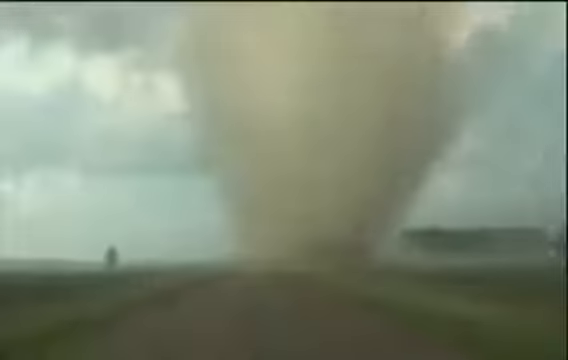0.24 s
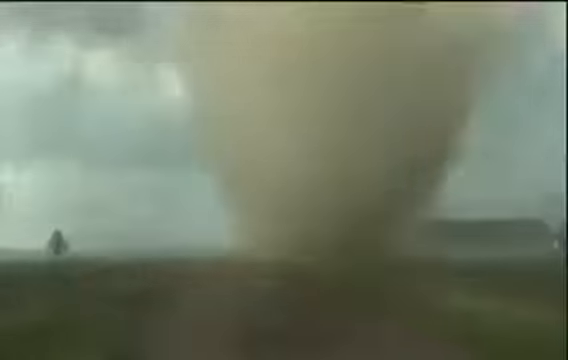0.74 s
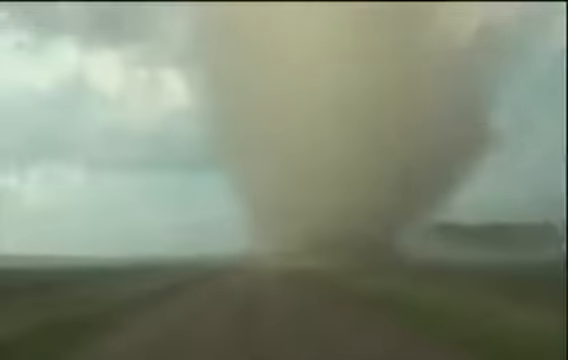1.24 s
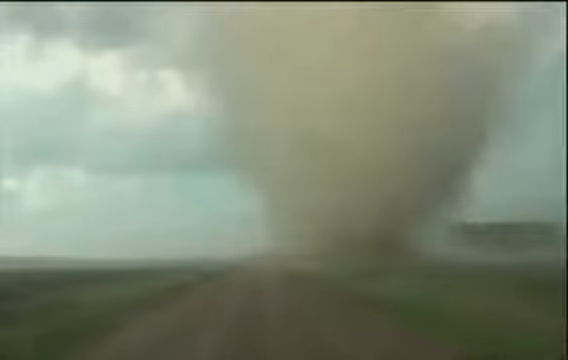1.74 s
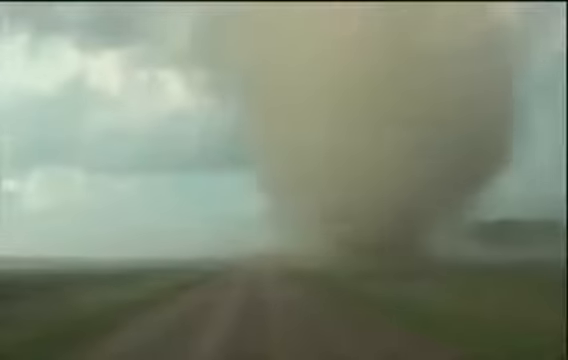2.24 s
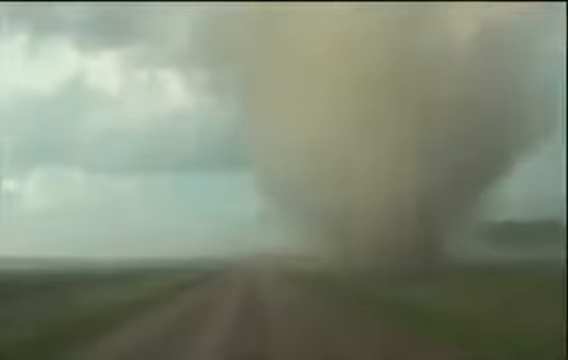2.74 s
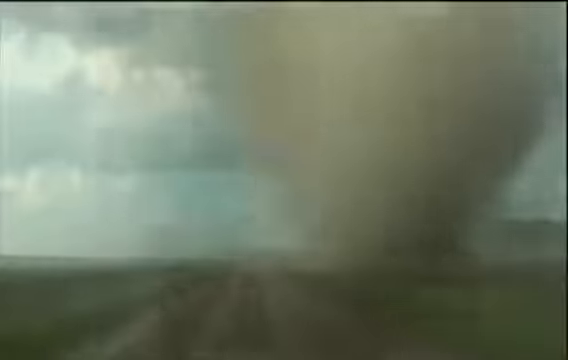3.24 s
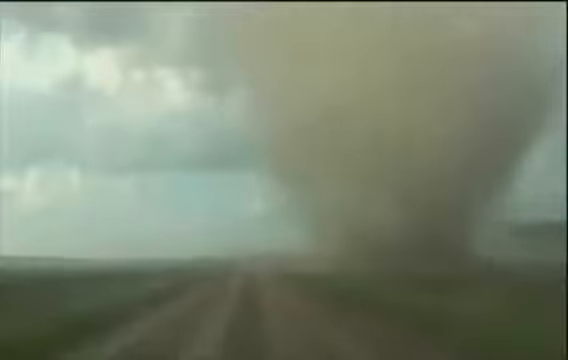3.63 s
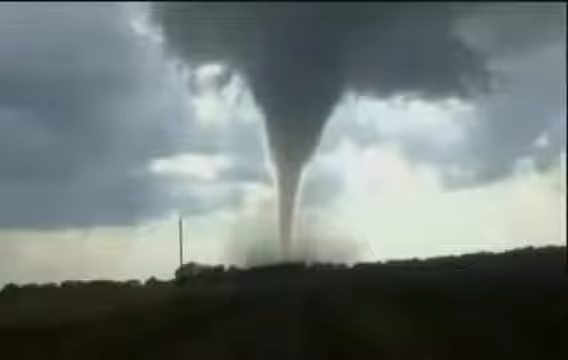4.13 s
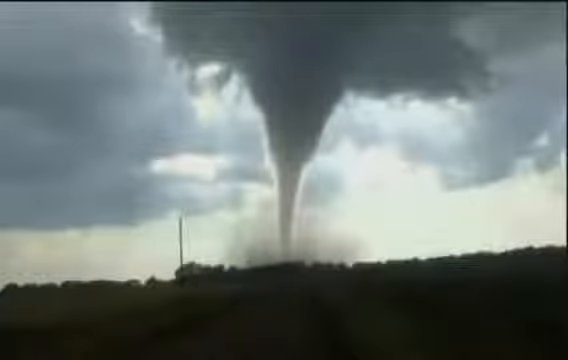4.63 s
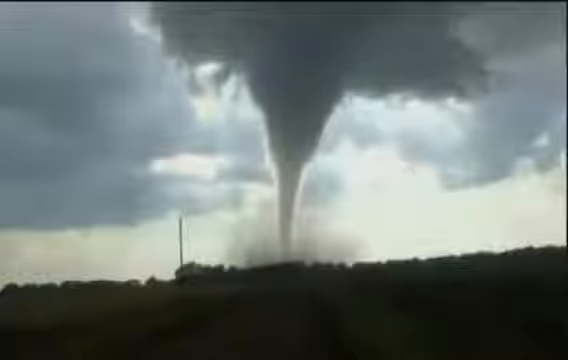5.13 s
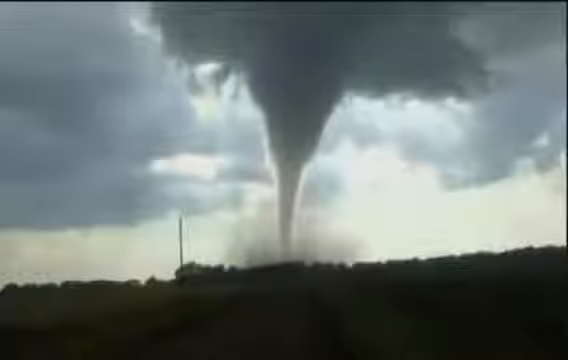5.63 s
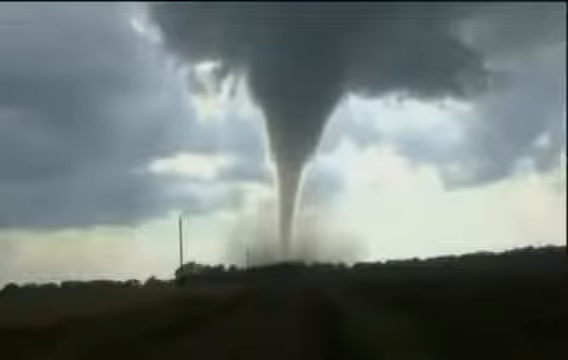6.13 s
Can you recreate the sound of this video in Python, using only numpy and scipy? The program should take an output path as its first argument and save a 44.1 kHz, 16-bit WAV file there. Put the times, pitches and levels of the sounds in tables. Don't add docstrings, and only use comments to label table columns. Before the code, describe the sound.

Close, overloaded storm roar with debris thudding and snapping on car bodywork, cutting suddenly to soft low wind, hiss and a faint whistling bird.

```python
import sys
import numpy as np
from scipy import signal
from scipy.fft import rfft, irfft
from scipy.io import wavfile
from scipy.ndimage import uniform_filter1d, minimum_filter1d

SR = 44100
rng = np.random.default_rng(int(sys.argv[2]) if len(sys.argv) > 2 else 0)


def transcribe(u):
    v = np.clip(np.atleast_2d(u).T, -1, 1)
    q = np.round(v * 32767).astype(np.int16)
    wavfile.write(sys.argv[1], SR, q)


def decibels_to_gain(level_db):
    exponent = np.asarray(level_db, float) / 20
    return 10 ** exponent


N = 282240

# frequency_hz [Hz], density_db [dB per Hz]
NEAR_SPECTRUM = [(12, -36.5), (20, 6), (54, 4), (156, -8.5), (264, -14.5), (326, -12), (613, -16),
                 (1070, -26), (1950, -32), (2230, -30.5), (7870, -39), (8980, -41.5), (10800, -45.5),
                 (14000, -90), (22000, -120)]
# time_s [s], force_db [dB], dust_db [dB]
NEAR_GALE = [(0.0, 0, -43.5), (0.3, 4.5, -40), (0.55, -0.5, -38), (1.1, 2, -37), (1.4, 4, -42),
             (1.65, 1, -40.5), (1.95, -2, -37.5), (2.12, 2, -32), (2.3, -1, -35.5), (2.5, -3, -32),
             (2.7, -1.5, -38), (2.95, -1.5, -41), (3.27, 0, -34.5), (3.5, 3, -40), (3.72, -2, -39),
             (4.0, 0.5, -37)]
# centre_s [s], lift_db [dB], length_s [s]
PORT_SLAMS = [(0.02, 9.5, 0.22), (0.21, 4, .08), (0.32, 4, 0.38), (0.5, 7, 0.11), (0.58, 13, .13),
              (0.72, 11, 0.082), (0.79, 5, .07), (0.84, 5, 0.1), (1.02, 11.5, 0.26), (1.14, 5.5, 0.13),
              (1.39, 9.5, 0.14), (1.5, 12, 0.12), (1.68, 7.5, 0.21), (1.86, 12.5, 0.22), (1.94, 8, .08),
              (2.03, 9, 0.24), (2.33, 11.5, 0.078), (2.43, 10.5, 0.1), (2.6, 5, .2), (2.8, 4.5, 0.21),
              (2.9, 6, 0.11), (2.99, 12.5, 0.087), (3.2, 3.5, 0.2), (3.37, 4.5, 0.16), (3.51, 5, 0.4),
              (3.68, 8, 0.21), (3.79, 14, 0.11), (3.94, 5.5, 0.19), (4.0, 8.5, 0.079)]
# centre_s [s], lift_db [dB], length_s [s]
BODY_ROLLS = [(0.08, 7, .15), (0.17, 3, 0.085), (0.44, 2.5, 0.27), (0.72, 6, 0.13), (0.87, 2.5, 0.29),
              (0.98, -4, 0.085), (1.06, 7, 0.14), (1.13, 6, 0.048), (1.18, -8.5, 0.05), (1.23, 2, 0.12),
              (1.36, -1, 0.22), (1.5, -2, 0.11), (1.67, 5, .14), (1.78, 4.5, 0.063), (1.85, 7, 0.2),
              (1.96, -2.5, .1), (2.07, -1, 0.12), (2.27, -1.5, .1), (2.44, 1.5, 0.086), (2.52, 2, 0.088),
              (2.6, -3, 0.067), (2.66, 0, 0.11), (2.73, -2, .14), (2.92, 1, 0.2), (3.05, 3, 0.13),
              (3.29, 5, 0.096), (3.55, 0.5, .12), (3.69, 2, 0.11), (3.94, 2, 0.089)]


def near_storm():
    force_db, dust_db = in_time(NEAR_GALE)
    rolls_db = eddies(BODY_ROLLS)
    duck_db = ducking(attack_s=.02, release_s=.065)
    port_duck_db = 1.3 * ducking(attack_s=.006, release_s=.08)

    buffet_db = -27 + force_db + eddies(PORT_SLAMS) + port_duck_db
    rumble_db = -24 + force_db + rolls_db + duck_db
    roar_db = -30.5 + .6 * force_db + .43 * rolls_db + .14 * (dust_db + 38.5) + .7 * duck_db
    grit_db = dust_db + 1.15 * duck_db + 1.5

    buffet = decibels_to_gain(buffet_db) * wind(NEAR_SPECTRUM, 22, 80, 1.6, 18.0, .6, 5.2)
    rumble = decibels_to_gain(rumble_db) * wind(NEAR_SPECTRUM, 84, 310, .96, 5.1, .55, 11.0)
    roar = decibels_to_gain(roar_db) * wind(NEAR_SPECTRUM, 275, 1325, 2.2, 8.4, 1.3, 24.0)
    grit = decibels_to_gain(grit_db) * wind(NEAR_SPECTRUM, 1350, 11000, 1.7, 22.0, 1.3, 25.0)
    return buffet + rumble + roar + grit


# start_s [s], depth_db [dB]
GAIN_DIPS = [
    (0.119, 9.5),
    (1.442, 8),
    (2.109, 11),
    (2.261, 1.5),
    (2.669, 1.5),
    (2.798, 0.5),
    (3.299, 8),
    (3.395, 2.5),
    (3.743, 9),
]


def ducking(attack_s, release_s):
    start_s, depth_db = np.transpose(GAIN_DIPS)
    after = np.maximum(np.arange(N) / SR - start_s[:, None], 0)
    dip = (1 - np.exp(-after / attack_s)) * np.exp(-after / release_s)
    return -depth_db @ dip / dip.max()


# start_s [s], peak_db [dB], pitch_hz [Hz], length_s [s]
DOOR_KNOCKS = [(0.271, -21, 399, 0.036), (1.034, -13.5, 672, 0.026), (1.448, -13.5, 742, 0.016),
               (2.1135, -13, 896, 0.014), (2.116, -11, 1700, 0.014), (2.131, -12, 636, 0.022),
               (2.14, -17, 418, .02), (2.121, -4.5, 418, 0.018), (3.298, -6.5, 512, 0.018),
               (3.697, -45, 633, 0.013), (3.98, -13, 981, 0.021)]


def door_knocks():
    return decibels_to_gain(-2.5) * swells(DOOR_KNOCKS)


# start_s [s], peak_db [dB], thud_db [dB], splinter_db [dB], crack_hz [Hz]
STONE_CRACKS = [
    (0.1172, -16, 1, -18.5, 2090),
    (2.6654, -23.5, 6, -2, 2390),
    (3.298, -23, 1, -3, 1800),
]
GRAIN_TICKS = [
    (0.118, -8.5, -12, -21.5, 1950),
    (2.261, -16.5, -10, -8, 1600),
    (2.5594, -19, -6.5, -11, 4200),
    (2.6147, -15, -13.5, -14.5, 5060),
]
TWIG_SNAPS = [
    (1.441, -8, -12, -13.5, 2040),
    (3.3958, -22.5, -4.5, -1, 2580),
]
HARD_CLODS = [
    (2.109, -10.5, -0.5, -3.5, 3580),
    (2.796, -20, -3, -17, 4130),
    (3.7400, -19, -5.5, -0.5, 3380),
]
DULL_SCUFFS = [
    (0.2712, -27, 6, -27, 1600),
    (1.0256, -27, 6.5, -8, 1600),
    (1.447, -25, 1, -33, 800),
    (2.137, -30.5, 2.5, -7.5, 1900),
    (2.1639, -29, -8, -2, 1870),
    (2.318, -29, -9, -3, 2260),
    (2.9273, -36.5, -11.5, -0.5, 1600),
    (3.247, -34.5, 1, 3.5, 2070),
]
GRAVEL_SPRAYS = [
    (3.687, -19.5, 4, -6.5, 1900),
    (3.966, -23, 7, -4, 1740),
]
# start_s [s], peak_db [dB], thud_db [dB], splinter_db [dB]
SMALL_SPATTER = [(0.357, -31.5, -16, -1.5), (0.396, -30, 1.5, -8.5), (0.633, -27, -5, -4),
                 (0.947, -21, -11, -13.5), (1.1092, -32.5, -1, -19), (1.22, -29.5, -9, -21),
                 (1.281, -26.5, -8.5, -19), (1.5674, -25, -5, -12), (1.6102, -27.5, 0, -16),
                 (1.7801, -36, -3, -18), (1.8275, -21.5, -5, -21), (2.0136, -23.5, 2.5, -4.5),
                 (2.0708, -35, 8.5, 2.5), (2.2185, -31, 5, -15), (2.361, -26.5, -5.5, -7),
                 (2.3993, -30, -10.5, 3), (2.5241, -20, -2, -11), (2.759, -29.5, -0.5, -11),
                 (3.3737, -28, -10, -10), (3.8707, -27.5, -5.5, -12), (3.9154, -29.5, -17, -1.5)]


def blows():
    hits = [(*r, .024) for r in STONE_CRACKS]
    hits += [(*r, .0065) for r in GRAIN_TICKS]
    hits += [(*r, .0035) for r in TWIG_SNAPS]
    hits += [(*r, 1700, .016) for r in SMALL_SPATTER]
    hits += [(*r, .025) for r in DULL_SCUFFS]
    hits += [(*r, .009 - .01 * (r[1] + 18)) for r in HARD_CLODS]
    return [(*r, .05) for r in hits] + [(*r, .026, .25) for r in GRAVEL_SPRAYS]


# start_s [s], peak_db [dB], thud_db [dB], splinter_db [dB], crack_hz [Hz]
FLYING_SHARDS = [(0.1245, -20, -4.5, -10.5, 2580), (0.1325, -20.5, -3.5, -12.5, 2300),
                 (0.146, -28.5, -2.5, -11, 1990), (0.512, -29.5, -7, -8, 2520), (1.0373, -25, 2, -10, 1900),
                 (1.4435, -13, -7.5, -31, 1050), (2.1095, -13.5, -2.5, -8, 1740),
                 (2.116, -12, -3.5, -6.5, 2100), (2.123, -16, -2.5, -5.5, 2110),
                 (2.129, -20.5, 1, -4, 1910), (2.471, -29.5, -13, -1, 3000), (2.675, -22.5, 1, -6.5, 1790),
                 (3.288, -26, -0.5, -4, 1800), (3.3013, -26, -4, 2.5, 3000), (3.51, -30.5, -5, -14.5, 2610),
                 (3.702, -25, -1, -2.5, 2600), (3.7435, -21.5, -14, -6, 3130), (3.464, -31, -15, -1, 1700)]


def shards():
    return debris([(*r, .0062, .05) for r in FLYING_SHARDS])


# mode_hz [Hz], width_hz [Hz], level_db [dB]
PANEL_MODES = [
    (462, 42, -0.5),
    (932, 170, -8),
]


def debris(hits):
    out = np.zeros(N)
    t = np.arange(round(.2 * SR)) / SR
    for s, peak_db, thud_db, splinter_db, crack_hz, length, rise_share in sorted(hits):
        grains = rms_one(rng.standard_normal(len(t)) * decibels_to_gain(2.4 * rng.exponential(1, len(t))))
        grains[:40] += 1.2 * np.hanning(40) * np.sign(grains[:40])

        length = np.clip(length, .002, .06)
        rise = 1 - np.exp(-t / (abs(rise_share) * length))
        crumbs = decibels_to_gain(-22.0) * np.exp(-t / (3.0 * length))
        burst = grains * rise * (np.exp(-(t / length) ** 2.4) + crumbs)
        sharp = grains * rise * np.exp(-(t / ((.75 + rise_share) * length)) ** 1.8)

        centre_hz = max(crack_hz, 1600)
        crack = decibels_to_gain(.5) * band(burst, .6 * centre_hz, 1.51 * centre_hz) + band(burst, 1100, 6300)
        crack = band(crack, 780, min(3.6 * crack_hz, 6500))
        thud = band(burst, 334, 1493)
        ringing = sum(decibels_to_gain(db) * band(thud, hz - width / 2, hz + width / 2) for hz, width, db in PANEL_MODES)
        thud = thud + ringing
        splinters = band(band(sharp, 5000, 9200), 3500, 10200)

        hit = decibels_to_gain(-1.0) * crack + decibels_to_gain(thud_db + 8.5) * thud + decibels_to_gain(splinter_db + 9) * splinters
        at = round(s * SR)
        out[at:at + len(t)] += decibels_to_gain(peak_db) * hit
    return out


# frequency_hz [Hz], density_db [dB per Hz]
FAR_SPECTRUM = [(12, -57), (20, -50.5), (86, -18), (124, -26), (209, -3), (288, -10), (340, -20.5),
                (445, -18.5), (526, -22.5), (699, -26), (1100, -36.5), (1430, -67), (2420, -120)]
# frequency_hz [Hz], density_db [dB per Hz]
HISS_SPECTRUM = [(900, -0.5), (1200, -4), (1500, -2.5), (2500, -3.5), (4000, -6.5), (5150, -6.5),
                 (5600, -15), (6200, -11), (7200, -18.5), (7800, -14.5), (8800, -23), (9800, -15.5),
                 (10800, -19), (12000, -35)]
# time_s [s], force_db [dB]
FAR_BREEZE = [
    (4.02, 6.5),
    (4.17, 7),
    (4.24, -1.5),
    (4.6, -4),
    (5.0, -3),
    (5.3, 2.5),
    (5.55, 1),
    (5.65, -0.5),
    (6.4, 1),
]
# centre_s [s], lift_db [dB], length_s [s]
AIR_LUMPS = [(4.08, 8.5, 0.13), (4.18, 5.5, .08), (4.32, 4.5, 0.27), (4.38, 4, .08), (4.47, 5, 0.12),
             (4.78, 8.5, 0.18), (4.88, 8, 0.098), (4.97, 1, .07), (5.24, -1, .1), (5.32, -10, .08),
             (5.4, 2.5, .1), (5.53, 9, 0.17), (5.7, 9, .16), (5.91, 5.5, .1), (6.0, 7.5, .07),
             (6.14, 4.5, .12), (6.24, 2, .1), (6.38, 5, .1)]
# centre_s [s], lift_db [dB], length_s [s]
AIR_FLURRIES = [(4.09, 3, 0.08), (4.48, 4.5, 0.073), (4.76, 1, .08), (4.95, 4.5, 0.076), (5.15, 1.5, 0.14),
                (5.33, 1, .1), (5.53, 6.8, 0.071), (5.72, 1, .1), (5.87, 4.5, 0.11), (6.09, 5.5, 0.1),
                (6.27, 5.1, 0.085), (6.35, 1.7, .06)]
# start_s [s], peak_db [dB], pitch_hz [Hz], length_s [s]
CAVITY_PUFFS = [(4.041, -16.5, 222, 0.07), (4.141, -28.5, 150, 0.03), (4.169, -28, 187, 0.026),
                (4.451, -31, 250, 0.02), (4.766, -50, 175, 0.027), (5.118, -24.5, 190, 0.04),
                (5.291, -20.5, 231, 0.035), (5.378, -20.5, 200, 0.037), (5.435, -27, 240, 0.029),
                (5.497, -22.5, 206, 0.038), (5.522, -18.5, 233, 0.036), (5.689, -30, 253, 0.036),
                (5.853, -24, 204, 0.024), (6.074, -24, 210, 0.053), (6.22, -21, 163, 0.034)]


def far_wind():
    (force_db,) = in_time(FAR_BREEZE)
    flurry_db = eddies(AIR_FLURRIES)
    thump_db = -43 + force_db + eddies(AIR_LUMPS)
    cavity_db = -40 + .8 * force_db + flurry_db
    roar_db = -45.5 + .29 * force_db + flurry_db

    thump = decibels_to_gain(thump_db) * wind(FAR_SPECTRUM, 24, 154.2, 2.9, 6.2, 2.6, 4.7)
    cavity = decibels_to_gain(cavity_db) * wind(FAR_SPECTRUM, 180, 332, 3.9, 62.0, 1.8, 37.0)
    roar = decibels_to_gain(roar_db) * wind(FAR_SPECTRUM, 324, 1160, .41, 24.0, 1.6, 60.0)
    hiss = decibels_to_gain(-51.5) * wind(HISS_SPECTRUM, 860, 16000, .28, 11.0, 1.0, 10.0)
    return thump + cavity + swells(CAVITY_PUFFS) + roar + hiss


# start_s [s], top_hz of the pitch arch [Hz], level_db [dB]
BIRD_PHRASES = [
    (4.04, 5300, -54),
    (4.415, 5400, -53),
    (4.795, 5250, -53),
    (5.15, 5100, -53),
    (5.55, 5200, -52.5),
    (5.93, 5200, -52.5),
    (6.31, 5200, -53),
]
# time_s into the phrase [s], pitch_share of top_hz [ratio]
PITCH_ARCH = [
    (0, .98),
    (.06, 1.02),
    (.11, 1.01),
    (.16, .93),
    (.26, .89),
    (.33, .88),
]


def bird():
    out = np.zeros(N + SR)
    t = np.arange(round(.019 * SR)) / SR
    fall = 1.05 - .11 * t / t[-1]
    spacing_s = .0195
    for s, top_hz, level_db in BIRD_PHRASES:
        for k, (detune, accent) in enumerate(rng.standard_normal((16, 2))):
            weak = 1 - k % 2
            arch_hz = top_hz * np.interp(spacing_s * k, *np.transpose(PITCH_ARCH))
            hz = arch_hz * (1 + .02 * detune - .04 * weak) * fall
            note = np.hanning(len(t)) * np.sin(2 * np.pi * np.cumsum(hz) / SR)
            note_db = level_db + 1 - 2.5 * weak - .3 * k + 1.8 * accent - .5
            at = round((s + spacing_s * k) * SR)
            out[at:at + len(t)] += decibels_to_gain(note_db) * note
    return out[:N]


def wind(colour, low_hz, high_hz, gust_db, gust_rate, patch_db, patch_rate):
    hz = np.arange(N // 2 + 1) * SR / N + 1
    points = np.array(colour)
    colour_db = np.interp(np.log(hz), np.log(points[:, 0]), points[:, 1])
    spectrum = rfft(rng.standard_normal(N)) * decibels_to_gain(colour_db)
    count = int(np.ceil(2 * np.log2(high_hz / low_hz)))
    place = np.log(hz / low_hz) / np.log(high_hz / low_hz) * count
    gust = gust_db * drift(gust_rate)
    out = 0
    for k in range(count + 1):
        share = np.cos(np.pi / 2 * np.clip(place - k, -1, 1)) ** 2
        share = share * (.7 if k in (0, count) else 1)
        out = out + irfft(spectrum * share, N) * decibels_to_gain(gust + patch_db * drift(patch_rate))
    out = out / (uniform_filter1d(out ** 2, size=5000) + 1e-20) ** .3
    return rms_one(out)


def eddies(table):
    t = np.arange(N) / SR
    total_db = 0
    for s, lift_db, length in table:
        total_db = total_db + lift_db * np.cos(np.pi * np.clip((t - s) / length, -.5, .5)) ** 2
    return total_db


def swells(table):
    out = np.zeros(N)
    for s, peak_db, hz, length in table:
        t = np.arange(round(np.clip(length, .01, .1) * SR)) / SR
        at = round((s - .006) * SR)
        out[at:at + len(t)] += decibels_to_gain(peak_db - 4.0) * np.hanning(len(t)) * np.sin(2 * np.pi * hz * t)
    return out


def drift(rate):
    r = np.exp(-80 * np.pi * rate / SR)
    slow = signal.lfilter([1], [1, -2 * r, r * r], rng.standard_normal(N // 40 + 2002))[2000:]
    return np.interp(np.arange(N) / 40, np.arange(len(slow)), rms_one(slow))


def in_time(rows):
    s, *columns = np.transpose(rows)
    return [np.interp(np.arange(N) / SR, s, c) for c in columns]


def band(x, low_hz, high_hz):
    return signal.sosfilt(signal.butter(2, [low_hz, high_hz], "band", fs=SR, output="sos"), x)


def rms_one(x):
    return x / np.sqrt(np.mean(x ** 2) + 1e-20)


def scene():
    far = np.clip((np.arange(N) / SR - 4.004) / .014, 0, 1)
    near_sound = near_storm() + debris(blows()) + door_knocks()
    far_sound = far_wind() + bird()
    mono = (1 - far) * near_sound + far * far_sound + shards()
    return np.stack([mono, mono])


def coarse_rounding(mid, side, size, spread, mid_db, narrow_db):
    n = np.arange(2 * size)
    k = np.arange(size * 99 // 200)
    window = np.sin(np.pi * (n + .5) / (2 * size))
    basis = window[:, None] * np.cos(np.pi / size * np.outer(n + .5 + size / 2, k + .5))
    frames = np.arange(N // size + 2)[:, None] * size + n
    lines = np.pad([mid, side], ((0, 0), (size, 3 * size)))[:, frames] @ basis

    level = uniform_filter1d(np.log(abs(lines[0]) + 1e-7), size=130, axis=1)
    level = -minimum_filter1d(-level, size=spread, axis=0, origin=spread // 4)
    octaves = np.log2((k + .5) * SR / (2 * size) / 3600)
    top_db = 2.5 * (octaves > 1.47)
    mid_tilt_db = 2.4 * np.maximum(octaves, 0) + np.minimum(octaves + .5, 0) + 2 * np.minimum(octaves + 2.2, 0)
    mid_step_db = mid_db + mid_tilt_db + top_db
    side_step_db = 5 - narrow_db * np.minimum(octaves - .2, 0) + top_db
    step = np.exp(level) * decibels_to_gain(np.array([mid_step_db, side_step_db]))[:, None]

    rounded = np.sign(lines) * np.floor(abs(lines) / step + .42) * step
    blocks = rounded @ basis.T * 2 / size
    out = np.zeros((2, N + 4 * size))
    out[:, frames[:, :size]] += blocks[:, :, :size]
    out[:, frames[:, size:]] += blocks[:, :, size:]
    return out[:, size:size + N]


def band_limit(x):
    return signal.sosfilt(signal.butter(12, 11950, fs=SR, output="sos"), x)


def record(dry):
    mono = .56 * np.tanh(dry[0] / .56)
    late = np.concatenate([[0], mono[:-1]])
    mid = (late + mono) / 2
    side = (late - mono) / 2

    bright = uniform_filter1d(side ** 2, size=128) + 1e-12
    attack = bright > 18 * uniform_filter1d(np.roll(bright, 500), size=800)
    short = np.clip(uniform_filter1d(attack * 1., size=1400) * 40, 0, 1)
    steady = coarse_rounding(mid, side, size=1152, spread=1, mid_db=6.5, narrow_db=8)
    sudden = coarse_rounding(mid, side, size=192, spread=5, mid_db=-6.5, narrow_db=1.2)
    mid, side = (1 - short) * steady + short * sudden
    return band_limit(np.stack([mid + side, mid - side]))


dry = scene()
out = record(dry)
transcribe(out)
```